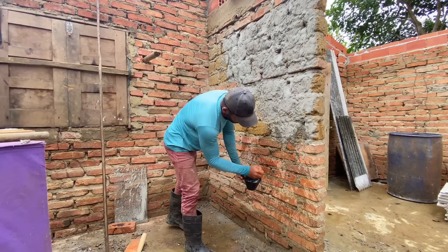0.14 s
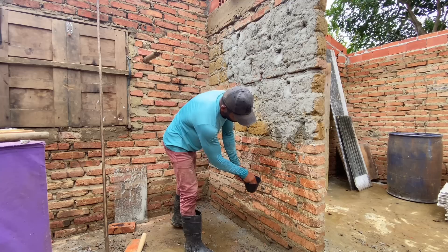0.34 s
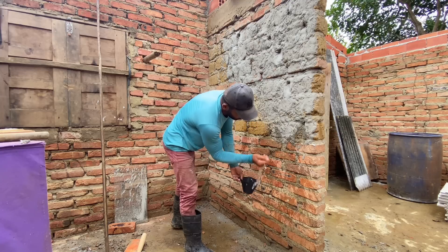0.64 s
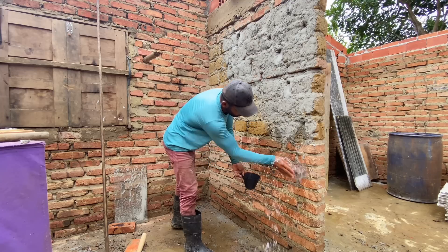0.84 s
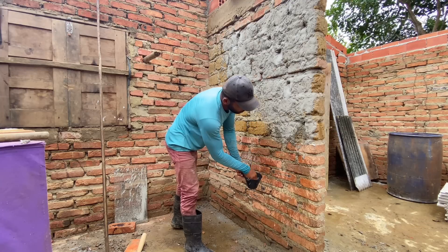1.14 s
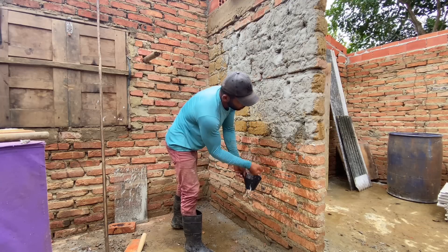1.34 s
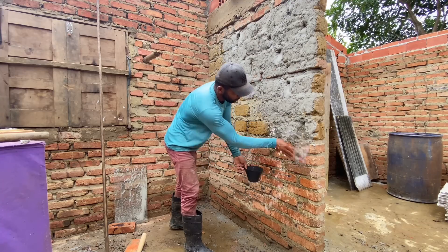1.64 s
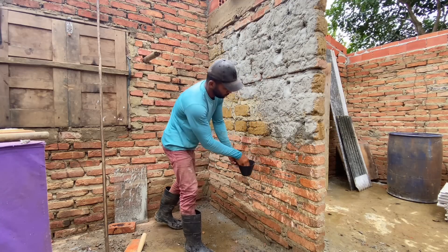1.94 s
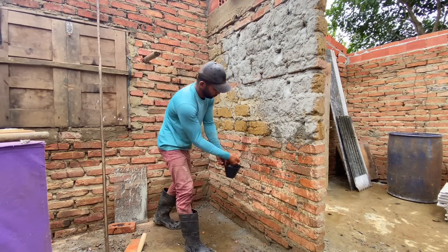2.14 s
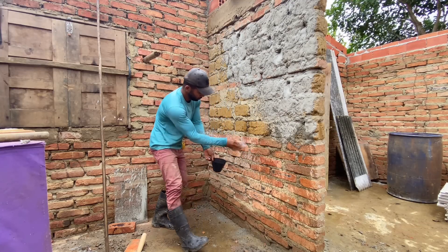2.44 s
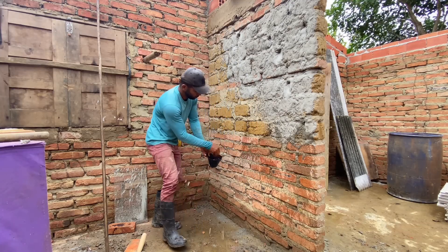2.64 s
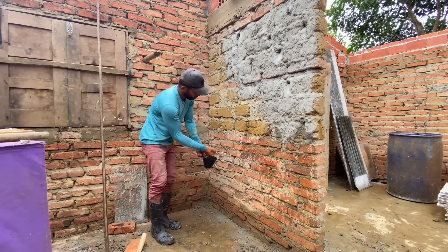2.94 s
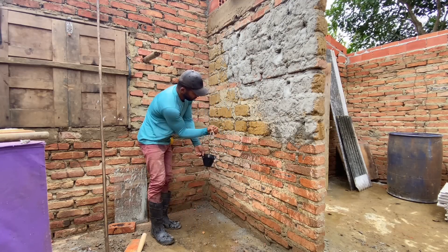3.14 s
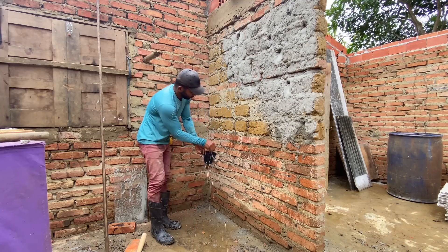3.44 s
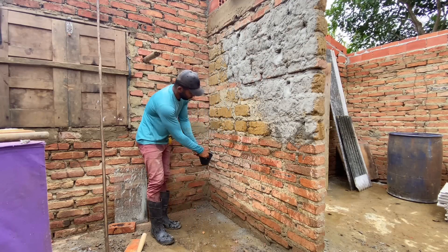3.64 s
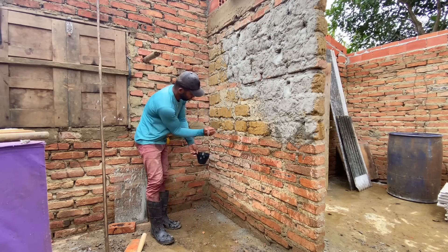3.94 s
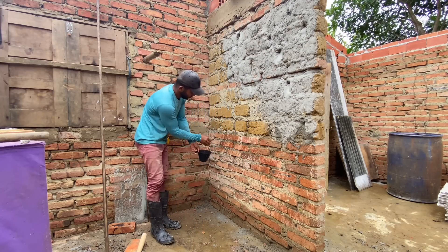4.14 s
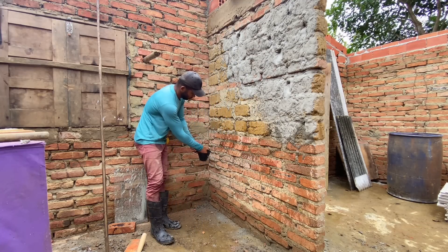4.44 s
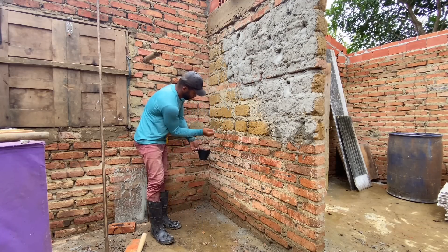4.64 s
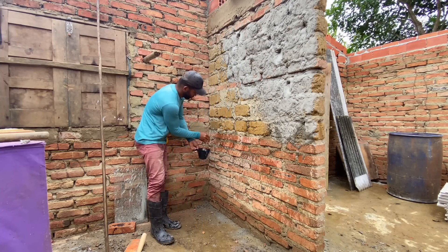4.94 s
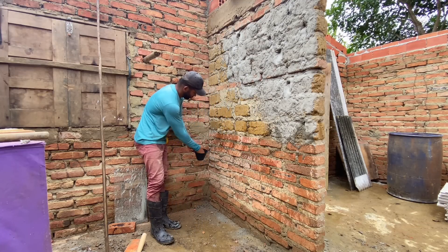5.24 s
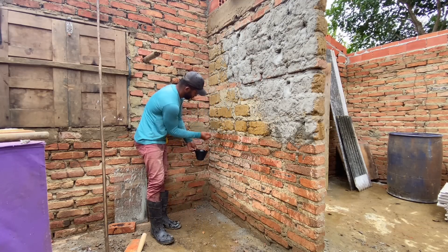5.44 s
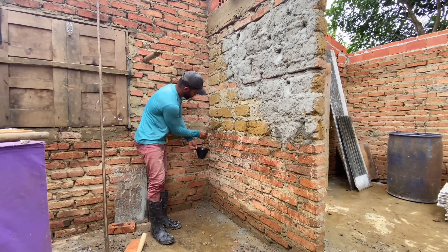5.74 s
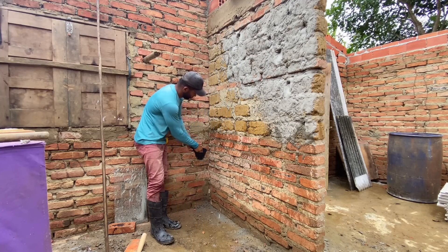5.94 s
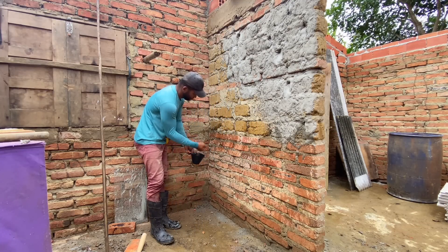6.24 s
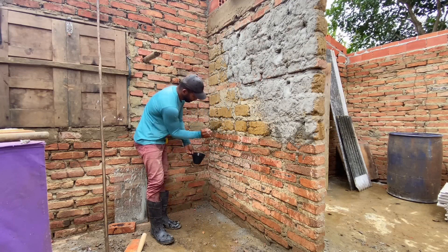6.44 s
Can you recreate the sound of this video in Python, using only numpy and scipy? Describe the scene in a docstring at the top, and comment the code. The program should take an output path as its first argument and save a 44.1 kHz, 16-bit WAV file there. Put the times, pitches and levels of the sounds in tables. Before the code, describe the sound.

In an open brick yard, a hand repeatedly scoops wet slurry from a small pot with short squelches, bubbly pops and soft hollow knocks, then flings it at a wall. Each throw lands as a loose cluster of sharp, bright wet smacks with a sandy hiss, then faint crumbs and drips. Close brick echoes and a very short tail; quiet air and faint birds behind. Fairly close stereo microphones.

```python
"""Flinging cement slurry at a brick wall

A mason scoops wet slurry from a small pot and flings it by hand at a brick wall in an open yard.
Blobs are decaying noise bursts with droplets; sand, crumbs and drips are filtered random impacts.
In the pot, gliding decaying sines are air pockets, and noise with a fixed hollow tone is each knock.
Brick echoes and a short diffuse tail follow; birds, an insect, quiet air and a low drone lie behind."""
import sys
import numpy as np
from scipy import signal
from scipy.fft import rfft, irfft, next_fast_len
from scipy.io import wavfile

SR = 44100
rng = np.random.default_rng(int(sys.argv[2]) if len(sys.argv) > 2 else 0)


def generate_wav(sig):
    """Save sig (samples, or channels by samples) to the path in sys.argv[1] as 16-bit PCM at SR."""
    pcm = np.round(np.clip(np.atleast_2d(sig).T, -1, 1) * 32767).astype(np.int16)
    wavfile.write(sys.argv[1], SR, pcm)


N = 291060  # length [samples]

# Spectrum of landing sand: (frequency [Hz], relative level [dB])
SAND_SPECTRUM = [(300, -19.5), (900, -10), (2000, -2.5), (4300, 2), (7000, 4), (11000, 2.5), (16000, -11.5)]
# The hand scooping in the pot:
# (time [s], relative squelch level [dB], dying time [s], centre [Hz], relative knock level [dB])
SCOOP_EVENTS = [(0.313, -57, 0.058, 1470, -56), (.6, -66, 0.037, 1560, -96), (0.784, -56, 0.029, 1090, -73),
                (1.136, -45.5, 0.074, 1290, -55), (1.207, -35.5, 0.022, 1140, -52),
                (1.35, -54.5, 0.047, 1347, -76), (1.44, -47.5, 0.048, 1130, -63),
                (1.605, -41.5, 0.0097, 940, -70), (2.005, -49.5, 0.037, 1210, -61.5),
                (2.757, -44.5, 0.054, 1540, -46.5), (2.815, -41, 0.028, 1080, -57),
                (3.078, -49.5, 0.032, 1530, -82), (3.208, -75, .022, 1090, -56.5),
                (3.531, -52.5, 0.08, 1020, -61), (4.377, -38, 0.025, 1150, -56),
                (5.09, -44.5, 0.036, 1410, -57), (5.223, -35.5, 0.0067, 1010, -58.5),
                (5.595, -56.5, 0.032, 920, -58.5), (5.911, -53, 0.093, 1160, -57),
                (6.05, -45, 0.03, 1400, -78), (6.501, -66, 0.013, 940, -50)]
# Blobs hitting brick:
# (time [s], relative level [dB], centre of the smack [Hz], relative fizz against the smack [dB])
BLOB_HITS = [(.115, -46, 5940, 5), (0.1967, -31, 7900, -23), (0.2214, -30, 5200, 1.5),
             (.517, -38, 4070, -26), (0.8935, -20.5, 3480, -11.5), (.905, -22, 4760, -11),
             (0.953, -41, 6760, -6), (.9903, -18, 2930, -12), (1.031, -22, 5470, -8),
             (1.057, -25, 5200, -4), (1.0667, -23, 7240, -24), (1.372, -35, 3200, -23),
             (1.5629, -26, 4450, -4), (1.5822, -16.5, 4440, -7.5), (1.6147, -27, 5000, -1),
             (1.63, -38, 7400, -2), (1.7819, -22, 4730, 3), (1.7937, -25, 2400, -11),
             (1.822, -26, 5970, -11), (1.8865, -22.5, 6100, -16), (1.9145, -26.5, 6200, 0.5),
             (1.941, -21.5, 6000, -27), (1.9778, -29.5, 8000, -8), (2.038, -20.5, 7200, -16),
             (2.0439, -29, 6460, -19), (2.253, -47, 6860, 2.5), (2.608, -17.5, 3650, -8.5),
             (2.6632, -40.5, 6700, -22), (2.7534, -22, 5100, -20), (3.4015, -18.5, 3880, -14),
             (3.4367, -21, 4300, -20), (3.4677, -20, 3760, -13), (3.4943, -30, 7300, -10),
             (3.548, -16, 3920, -44), (3.596, -28.5, 7860, 5), (3.6287, -23.5, 2740, -1),
             (3.6328, -13.5, 4020, -20), (3.677, -36.5, 5170, 2), (3.922, -33.5, 2850, -15),
             (4.086, -40, 6920, -1), (4.1928, -44.5, 4270, 0), (4.221, -23, 4370, -18),
             (4.2518, -28.5, 4640, -8), (4.269, -23.5, 7000, -9), (4.2852, -24.5, 8350, 3),
             (4.3307, -34.5, 4500, 2), (4.4218, -20, 7100, -5), (4.755, -30.5, 6700, 5.5),
             (4.943, -50.5, 4200, -4), (5.004, -25.5, 5600, -3), (5.021, -22, 6300, -21),
             (5.1405, -43, 5800, 8.5), (5.1508, -40, 4280, 0), (5.1958, -26.5, 6000, -12),
             (5.211, -18, 7400, -10), (5.3145, -22, 5050, -41), (5.713, -35, 5070, -10),
             (5.8477, -52, 4670, 10), (5.86, -43, 4930, 5.5), (5.894, -36, 4500, 0),
             (6.0059, -21, 6400, -17), (6.0177, -25, 4640, -5), (6.585, -50, 4120, 12.5)]


def amp(db):
    """Converts a level in decibels to an amplitude ratio."""
    return 10 ** (np.asarray(db) / 20)


def unit(x):
    """Normalises a signal to a root-mean-square value of 1."""
    return x / np.sqrt(np.mean(x ** 2) + 1e-20)


def read(points, hz):
    """Interpolates a spectrum on the logarithmic frequency axis of pitch perception."""
    f, value = np.transpose(points)
    return np.interp(np.log(hz + 1), np.log(f + 1), value)


def colour(x, gain):
    """Linear filtering: multiplies the spectrum by a gain that is a function of frequency."""
    size = next_fast_len(x.shape[-1] + 512)
    spectrum = rfft(x, size) * gain(np.fft.rfftfreq(size, 1 / SR))
    return irfft(spectrum, size)[..., :x.shape[-1]]


def hump(hz, centre_hz, octaves):
    """Resonance gain, symmetrical in octaves, down to a quarter at the given distance."""
    return 1 / (1 + (np.log2((hz + 1) / centre_hz) / octaves) ** 2) ** 2


def add(mix, s, sound):
    """Superposition: adds a sound in at time s, cut off at the ends of the mix."""
    start = round(s * SR)
    sound = sound[max(-start, 0):]
    part = mix[max(start, 0):][:len(sound)]
    part += sound[:len(part)]


def grains(size, per_s, spread_db):
    """Shot noise: random tiny impacts of either sign, a few much larger than the rest."""
    height = amp(spread_db * np.minimum(rng.exponential(1, size), 4))
    sign = rng.choice([-1., 1.], size)
    lands = rng.random(size) < per_s / SR
    return unit(height * sign * lands)


def swell(rise, fall):
    """Transient envelope: a linear build-up, then exponential decay (times in s)."""
    t = np.arange(SR // 2) / SR
    build = np.minimum(t / max(rise, 1e-4), 1)
    return build * np.exp(-np.maximum(t - rise, 0) / max(fall, 1e-4))


def corner(echo_db, tail_db, shared, mono_hz=450, dull_hz=7000):
    """Impulse response: discrete early reflections off rough brick, then a decaying diffuse tail."""
    # Brick and floor echoes: (delay before a small random lag [s], relative gain)
    echo_paths = [(.0012, 1), (.0058, 0.21), (.0068, 0.67), (.0096, 0.18), (0.013, .22), (0.019, 0.17),
                  (.0255, 0.071)]
    # Reverberation time: (frequency [Hz], time to fall 60 dB [s])
    decay_times = [(150, 0.77), (900, 0.15), (4000, 0.23), (9000, 0.24), (16000, 0.063)]
    size = SR // 3
    early = np.zeros((2, size))
    for delay, gain in echo_paths:
        for side in early:
            scatter = unit(rng.standard_normal(16)) / 4
            add(side, delay + rng.uniform(0, .0008), gain * scatter)
    early = colour(early, lambda f: 1 / np.hypot(1, f / dull_hz))  # rough brick scatters the treble away
    onset = np.clip(np.arange(size) / SR / 0.0025 - .4, 0, 1)
    taps = rng.standard_normal((3, size)) * onset
    diffuse = np.sqrt(shared) * taps[2] + np.sqrt(1 - shared) * taps[:2]
    hz, t, bands = signal.stft(diffuse, SR, nperseg=256)
    decay = amp(-60 * t / read(decay_times, hz)[:, None])
    tail = signal.istft(bands * decay, SR, nperseg=256)[1][:, :size]
    response = amp(echo_db) * early + amp(tail_db) * tail / np.linalg.norm(tail[0])
    middle = response.mean(axis=0)  # long waves reach both microphones alike
    return middle + colour(response - middle, lambda f: f / np.hypot(f, mono_hz))


def yard(x, echo_db, tail_db, shared, count=5):
    """Convolution with crossfaded responses, for changing landing spots, plus the direct wave."""
    # Phase difference of the direct wave: (frequency [Hz], lead of the left microphone [rad])
    left_lead = [(0, 8.5), (700, 0.67), (4400, 0.2), (5500, -1.5), (7200, -7.5), (8500, -11),
                 (10300, -24.5), (12800, -16), (16500, -13)]
    out = np.array([colour(x, lambda f: np.exp(1j * read(left_lead, f))), x])
    spot = np.arange(N) / SR / .035  # a new response enters every 35 ms, in rotation
    for k in range(count):
        here = np.sin(np.pi / 2 * np.minimum((spot - k) % count, 2))
        response = corner(echo_db, tail_db, shared)
        out += signal.oaconvolve((x * here)[None], response, axes=1)[:, :N]
    return out


def air(shared=0.17, level_db=-66.5, drone_hz=91, drone_db=-86):
    """Partially coherent noise: outdoor air partly alike at both ears, with a far low drone."""
    # Spectrum of outdoor air: (frequency [Hz], relative level [dB])
    air_spectrum = [(15, -41), (25, -19), (97, 12.5), (677, 3), (1020, 4), (4140, 5.5), (6050, 5.5),
                    (6740, 0.5), (8590, -1), (9320, -28), (10400, -4.5), (11900, -23), (13200, -24.5),
                    (14400, -27.5), (16000, -10.5)]
    noise = rng.standard_normal((4, N))
    pair = np.sqrt(shared) * noise[2] + np.sqrt(1 - shared) * noise[:2]
    drone = amp(drone_db) * unit(colour(noise[3], lambda f: hump(f, drone_hz, 0.12)))
    return amp(level_db) * unit(colour(pair, lambda f: amp(read(air_spectrum, f)))) + drone


def whistle(hz, blur_hz=260):
    """Narrow-band modulation: a bird's note along a pitch curve, blurred by leaves and walls."""
    u, angle = np.linspace(0, 1, len(hz)), 2 * np.pi * np.cumsum(hz) / SR
    noise = rng.standard_normal((2, 2 * SR))
    a, b = unit(colour(noise, lambda f: np.exp(-(f / blur_hz) ** 2)))[:, :len(u)]
    return np.sqrt(u * (1 - u)) * (a * np.sin(angle) + b * np.cos(angle))


def trees(insect_hz=7000, insect_db=-75, ease=0.21):
    """Frequency modulation: distant birds slur upwards or warble, over an insect's band of noise."""
    # Rising bird whistles: (time [s], relative level [dB])
    slurs = [(0.386, -58.5), (5.813, -56.5)]
    # Thin warbled bird phrases: (time [s], length [s], pitch [Hz], relative level [dB])
    warbles = [(4.919, 0.37, 8650, -56), (5.277, 0.47, 8916, -56.5), (6.154, 0.12, 9030, -60),
               (6.314, 0.18, 7660, -60.5), (6.359, 0.17, 4160, -55)]
    slur_s, from_hz, to_hz = 0.22, 4180, 6660
    warbles_per_s, depth, swing_db = 7.5, 0.019, 2.5
    blur = 0.033  # width of a warbled note as a share of its pitch
    out = amp(insect_db) * unit(colour(rng.standard_normal(N), lambda f: hump(f, insect_hz, .09)))
    u = np.linspace(0, 1, int(slur_s * SR))
    rising_hz = from_hz + (to_hz - from_hz) * u * (1 + ease * (1 - u))
    for s, db in slurs:
        add(out, s, amp(db) * whistle(rising_hz))
    for s, length, hz, db in warbles:
        t = np.arange(0, length, 1 / SR)
        turn = 2 * np.pi * warbles_per_s * t
        note = whistle(hz * (1 - depth * np.cos(turn)), blur_hz=blur * hz)
        add(out, s, amp(db + swing_db * np.sin(turn)) * note)  # loudest on the way up
    return out


def trickle(level_db=-5.0, drips_db=-10):
    """Random impacts and damped oscillation: crumbs tick down the wall with sparser pitched drips."""
    # Slurry trickling and crumbling off the wall: (time [s], relative level [dB])
    runoff = [(0.0, -69), (0.79, -60.5), (0.99, -62), (1.23, -62.5), (1.45, -57), (1.95, -56.5),
              (2.09, -64), (2.3, -62), (2.66, -60.5), (2.98, -72), (3.55, -57), (3.71, -69), (3.95, -65.5),
              (4.3, -71), (4.63, -64), (5.13, -60.5), (6.29, -60.5), (6.6, -55)]
    t = np.arange(N) / SR
    crumbs = unit(colour(grains(N, 1200, 7.0), lambda f: amp(read(SAND_SPECTRUM, f))))
    drips = np.zeros(N)
    for hz in np.geomspace(1300, 8000, num=14):
        cycles = hz * t[:600]
        drop = np.sin(2 * np.pi * cycles) * np.exp(-cycles / 0.52)
        drips += signal.oaconvolve(grains(N, 14, 5.0), drop)[:N]
    level = amp(np.interp(t, *np.transpose(runoff)) + level_db)
    return level * (crumbs + amp(drips_db) * unit(drips))


def bumps(octaves=2.1, ring_db=2, boom_db=-11, level_db=-4, lag_s=0.0044):
    """Forced and modal vibration: a knock gives a gritty scuff, a hollow pot ring and a low boom."""
    pot_hz, boom_hz = 300.5, 94  # every knock finds the same two notes
    rise_s, fall_s = 0.0086, 0.0097
    drag = 0.67  # the longer the scoop, the longer the pot scuffs
    out = np.zeros(N)
    for s, _, fall, _, db in SCOOP_EVENTS:
        shape = swell(rise_s, fall_s + drag * fall)
        t = np.arange(len(shape)) / SR
        scuff = shape * unit(colour(grains(len(t), 2500, 1.4), lambda f: hump(f, pot_hz, octaves)))
        ring = shape ** 3 * np.sin(2 * np.pi * pot_hz * t)
        boom = shape * np.sin(2 * np.pi * boom_hz * t)
        knock = scuff + amp(ring_db) * ring + amp(boom_db) * boom
        add(out, s + lag_s, amp(db + level_db) * knock)
    return out


def squelches(per_s=450, cycles=1.6, scatter=0.41, glide=0.26, rasp_db=-4, level_db=-4):
    """Bubble acoustics: fingers collapse many small air pockets, each a few gliding cycles, in a rasp."""
    build = 0.68  # a squelch builds up for this share of its dying time
    out, t = np.zeros(N), np.arange(1024) / SR
    for s, db, fall, hz, _ in SCOOP_EVENTS:
        shape = swell(build * fall, fall)
        pops = np.zeros(len(shape))
        for k, (late, pitch, size, slope) in enumerate(rng.uniform(-0.99, 1, (200, 4))):
            turns = hz * 2 ** (2 * scatter * pitch) * t
            phase = 2 * np.pi * turns * (1 + glide * slope * np.tanh(turns / 10))
            pop = np.sin(phase) * turns * np.exp(-turns / cycles * 2)
            add(pops, (k + .5 + late / 2) / per_s, amp(9.6 * size) * pop)
        rasp = colour(grains(len(shape), 2500, 2.2), lambda f: hump(f, hz * 1.67, 2.14))
        add(out, s, amp(db + level_db) * shape * (unit(pops) + amp(rasp_db) * unit(rasp)))
    return out


def gulps(rise_cycles=3.04, level_db=-2, rasp_octaves=1.36):
    """Bubble resonance: an air pocket tears open with a wet rasp and rings, sagging in pitch."""
    # Air pockets popping in the pot:
    # (time [s], relative level [dB], pitch at the sixth cycle [Hz], ring decay [cycles])
    pockets = [(0.4026, -28, 1677, 4.5), (.568, -37.5, 1680, 4.6), (.6, -43.5, 1670, 3.6),
               (0.673, -39, 1675, 4.2), (1.083, -42, 1590, 3.3), (1.129, -48, 870, 15),
               (1.142, -33.5, 1760, 2.2), (1.174, -30.5, 2240, 5.8), (1.176, -35.5, 876, 10.6),
               (1.215, -32, 1440, 2.8), (1.222, -31, 1240, 4), (1.233, -26.5, 1670, 2.5),
               (1.249, -29.5, 869, 7.5), (1.42, -42.5, 1960, 5), (1.446, -40, 1010, 2.2),
               (1.464, -37.5, 1950, 5.2), (1.511, -48, 953, 3.6), (2.002, -42, 1760, 2.8),
               (2.002, -49, 840, 6.7), (2.068, -45.5, 1080, 2.6), (2.687, -50, 1580, 11.4),
               (2.818, -28, 1566, 5.1), (2.844, -25.5, 1078, 7.1), (3.094, -39.5, 1080, 4.1),
               (3.124, -35, 2074, 2.2), (3.531, -34.5, 940, 8.7), (3.564, -36.5, 883, 3.2),
               (3.616, -33, 737, 4.2), (3.637, -26, 870, 4.3), (3.826, -56, 1380, 2.1),
               (4.369, -39, 1920, 5.1), (4.37, -39, 1174, 5.6), (4.4, -29, 1215, 4.8),
               (4.412, -29.5, 812, 3.5), (4.679, -62.5, 1680, 11.5), (4.765, -59, 1200, 3.5),
               (5.112, -38.5, 880, 3.5), (5.231, -15.5, 884, 2), (5.244, -24.5, 933, 3.5),
               (5.256, -21, 995, 1.8), (5.264, -24.5, 950, 3.4), (5.49, -36, 2325, 11.5),
               (5.504, -46.5, 863, 2.4), (5.916, -32, 820, 3.1), (6.061, -32.5, 1187, 3.7),
               (6.07, -33.5, 748, 1.5), (6.096, -38.5, 1230, 8.7), (6.115, -39, 2050, 3.9),
               (6.334, -50, 2380, 3.8), (6.467, -36, 1690, 9.4), (6.508, -26, 800, 2.1)]
    glide_per_cycle = -0.0023  # share of the pitch
    # Strong pockets ring cleanly, weak ones mostly rasp
    usual_db, usual_rasp_db, rasp_per_db = -37, -6, -0.6227
    out = np.zeros(N)
    for s, db, hz, ring_cycles in pockets:
        fall = ring_cycles / hz
        rasp_db = usual_rasp_db + rasp_per_db * (db - usual_db)
        shape = swell(rise_cycles / hz, fall)
        cycles = hz * np.arange(len(shape)) / SR
        gliding_hz = hz * (1 + glide_per_cycle * np.minimum(cycles - 6, 12))
        ring = np.sin(2 * np.pi * np.cumsum(gliding_hz) / SR)
        rasp = unit(colour(grains(len(shape), 6000, 2.9), lambda f: hump(f, hz * 1.18, rasp_octaves)))
        pocket = shape * ring + amp(rasp_db) * swell(0.00021, fall) * rasp
        add(out, s, amp(db + level_db) * pocket)
    return out


def sprays(per_s=6000, spread_db=4, level_db=-2):
    """Shot noise: a fan of sandy droplets lands so densely that its impacts merge into a short hiss."""
    # Fans of slurry landing:
    # (time [s], relative level [dB], dying time [s], tilt towards the treble [dB per octave])
    fans = [(-.08, -50, 0.073, 6.5), (0.307, -44.5, 0.027, -5.5), (.608, -52.5, .02, -2),
            (0.788, -38.5, .022, 5.5), (.87, -49, 0.087, 3), (1.057, -43.5, 0.021, 6.5),
            (1.161, -47, 0.018, -10), (1.599, -39.5, 0.017, .5), (1.775, -45.5, 0.032, 1.5),
            (1.895, -48, 0.03, 7), (2.047, -49, .026, -1.5), (2.432, -44.5, 0.028, 4),
            (2.739, -44.5, 0.037, -12.5), (2.824, -38.5, 0.0069, 2), (3.073, -42.5, .013, -5),
            (3.202, -38, 0.021, 2), (3.392, -39, 0.0096, 7), (3.62, -43, 0.012, 14),
            (3.983, -48, 0.024, 0.5), (4.246, -48.5, 0.038, 3.5), (4.411, -45, 0.035, 1),
            (4.759, -45, 0.023, 1.5), (5.204, -42.5, 0.011, -11), (5.586, -44.5, 0.037, 5),
            (6.055, -39, 0.016, -2.5), (6.497, -48.5, 0.019, -1.5)]
    build = 0.93  # a fan builds up for this share of its dying time
    out = np.zeros(N)
    for s, db, fall, tilt_db in fans:
        shape = swell(build * fall, fall)
        impacts = grains(len(shape), per_s, spread_db)
        # The tilt levels off towards the bass
        hiss = colour(impacts, lambda f: amp(read(SAND_SPECTRUM, f) + tilt_db * np.log2(f / 5000 + 0.84)))
        add(out, s, amp(db + level_db) * shape * unit(hiss))
    return out


def snaps(level_db=-3, centre_hz=9000, octaves=0.75, fizz_share=0.75, lag_s=0.00046):
    """Impulse excitation: a blob's first touch is one thin, bright tick, stronger in fizzy blobs."""
    out = np.zeros(N)
    for s, db, _, bright_db in BLOB_HITS:
        add(out, s + lag_s, amp([db + level_db + fizz_share * bright_db]))
    return 2 * colour(out, lambda f: hump(f, centre_hz, octaves))


def splats(crack_s=0.00033, spatter_s=0.0025, octaves=0.9, smack_db=-5, fizz_db=-1,
           slap_db=-26, slap_hz=1500, snap=2.2, flight_s=0.00079):
    """Impact noise: a blob snaps on brick, cracks as it flattens, then throws droplets around it."""
    # Spectrum of the finest fizz: (frequency [Hz], relative level [dB])
    fizz_spectrum = [(500, 11), (2000, -51), (5000, -35), (8000, 28), (11500, 34), (16000, -13.5)]
    # Heavy blobs stick whole, light ones break into droplets
    usual_db, usual_spatter_db, spatter_per_db = -24.5, -16.5, -0.76
    lead = 64  # samples of silence before the hit, room for the filters to spread backwards
    out, t = np.zeros(N), np.arange(4096) / SR
    for s, db, hz, bright_db in BLOB_HITS:
        crack = rng.choice([-1., 1.], (3, len(t))) * np.exp(-t / crack_s)
        crack[:, 0] = snap
        flight = np.minimum(t / flight_s, 1)  # thrown droplets land a moment after the blob
        spatter_db = usual_spatter_db + spatter_per_db * (db - usual_db)
        spatter = amp(spatter_db) * grains(len(t), 9000, 6.9) * flight * np.exp(-t / spatter_s)
        hit = crack + spatter * rng.choice([-1., 1.], crack.shape)
        hit = np.pad(hit, ((0, 0), (lead, 0)))
        smack = unit(colour(hit[0], lambda f: hump(f, hz, octaves)))
        fizz = unit(colour(hit[1], lambda f: amp(read(fizz_spectrum, f))))
        slap = unit(colour(hit[2], lambda f: hump(f, slap_hz, 4.7)))
        blob = smack + amp(bright_db + fizz_db) * fizz + amp(slap_db) * slap
        add(out, s - lead / SR, amp(db + smack_db) * hit.std() * blob)
    return out


def scene():
    """Superposition of wall, pot and trees in the brick yard, over the outdoor air."""
    pot_low_hz, gulp_low_hz = 703, 330  # pot and small pockets radiate little below these
    wall = yard(splats() + sprays() + trickle() + trees(), echo_db=4, tail_db=-0.5, shared=0.084)
    ticks = yard(snaps(), echo_db=4, tail_db=-17, shared=.1)
    churning = colour(squelches(), lambda f: f ** 4 / np.hypot(f ** 4, pot_low_hz ** 4))
    popping = colour(gulps(), lambda f: f ** 2 / np.hypot(f ** 2, gulp_low_hz ** 2))
    pot = yard(popping + churning, echo_db=-2.0, tail_db=-3.0, shared=0.1)
    knocks = yard(bumps(), echo_db=3.0, tail_db=-6.5, shared=0.29)
    return wall + ticks + pot + knocks + air()


def record(dry):
    """Transducer response: the colour and imbalance of two microphones, then a low-pass band limit."""
    # Colour common to both microphones: (frequency [Hz], gain [dB])
    mic_colour = [(20, -23), (45, -3), (80, -5.5), (8600, -1), (9400, -4), (10300, 2), (11800, 4),
                  (13300, -4.5), (14400, 13), (16000, -9)]
    # Imbalance: (frequency [Hz], left minus right [dB])
    balance = [(100, 3.5), (700, 1.5), (1300, 1), (2400, 0.5), (4400, 4.5), (8000, 2.5), (15000, -2)]
    edge_hz = 16600
    sides = np.array([[1], [-1]]) / 2
    heard = colour(dry, lambda f: amp(read(mic_colour, f) + sides * read(balance, f)))
    low_pass = signal.firwin(401, edge_hz, window=("kaiser", 8), fs=SR)
    return signal.oaconvolve(heard, low_pass[None], "same")


dry = scene()
out = record(dry)
generate_wav(out)
```